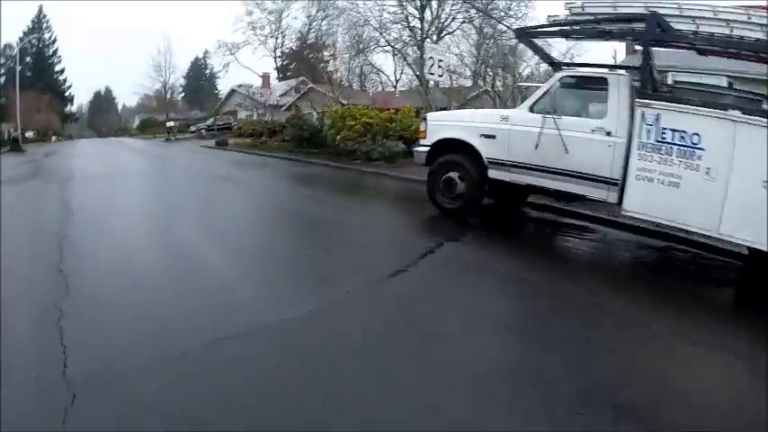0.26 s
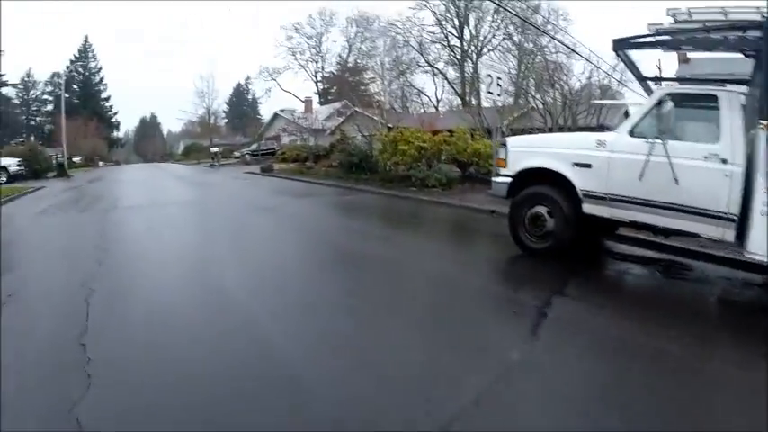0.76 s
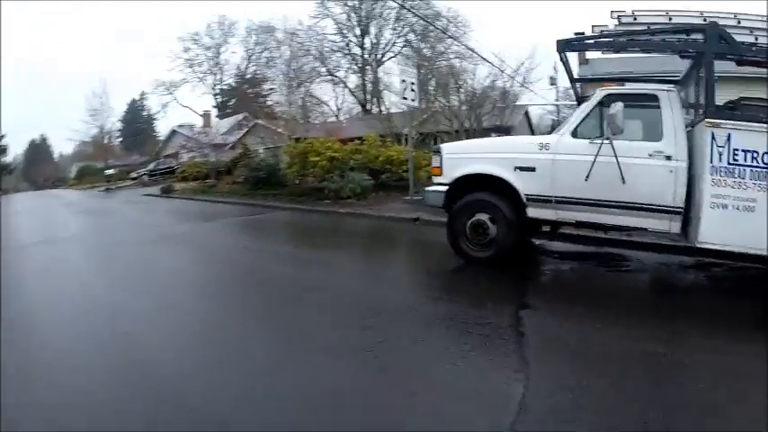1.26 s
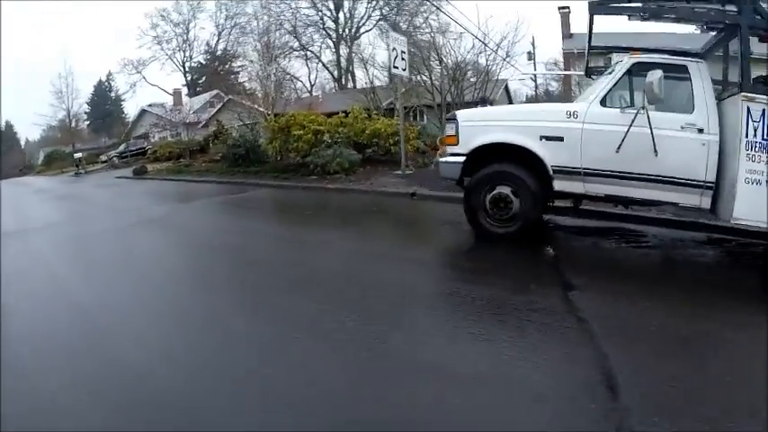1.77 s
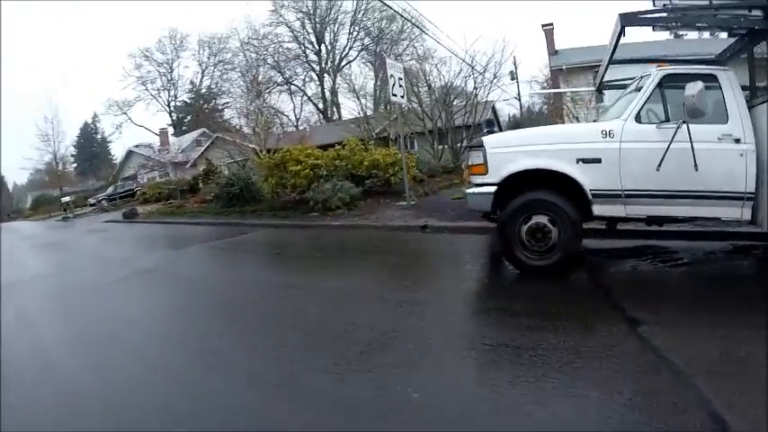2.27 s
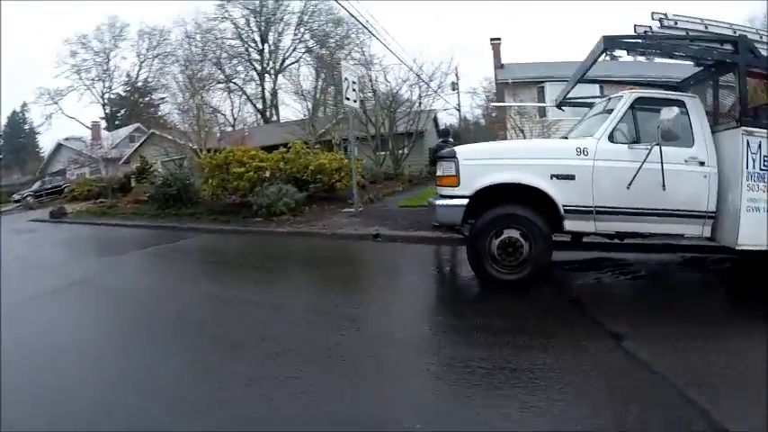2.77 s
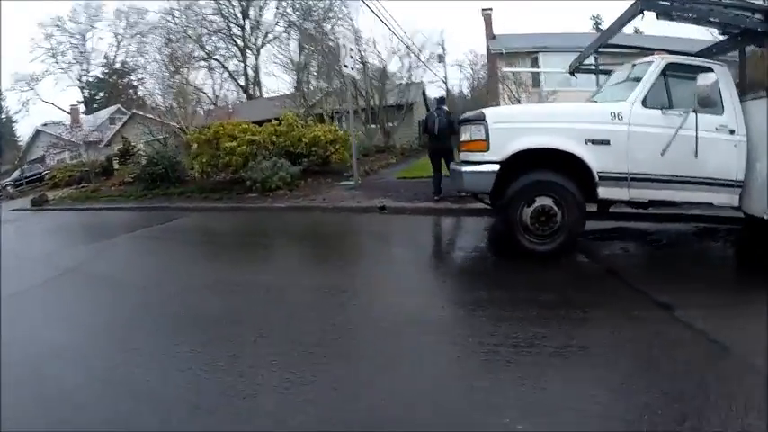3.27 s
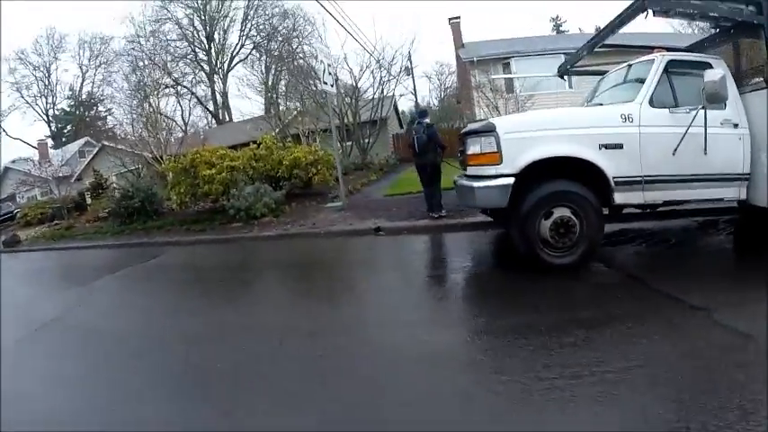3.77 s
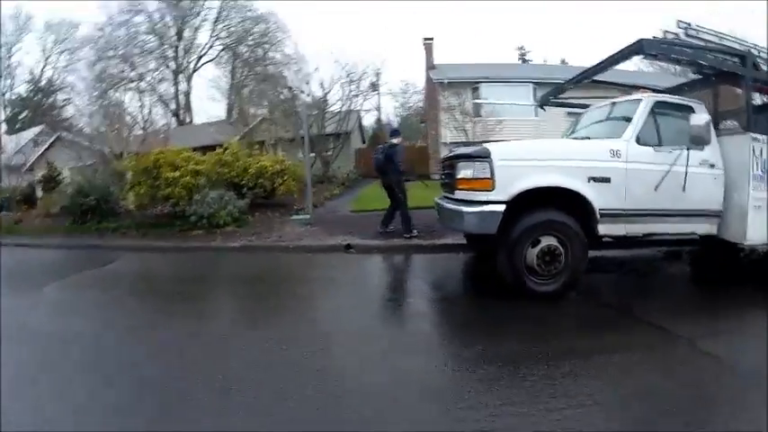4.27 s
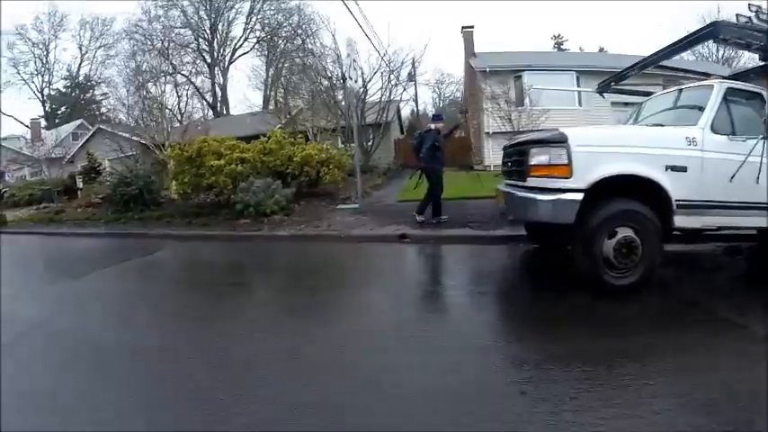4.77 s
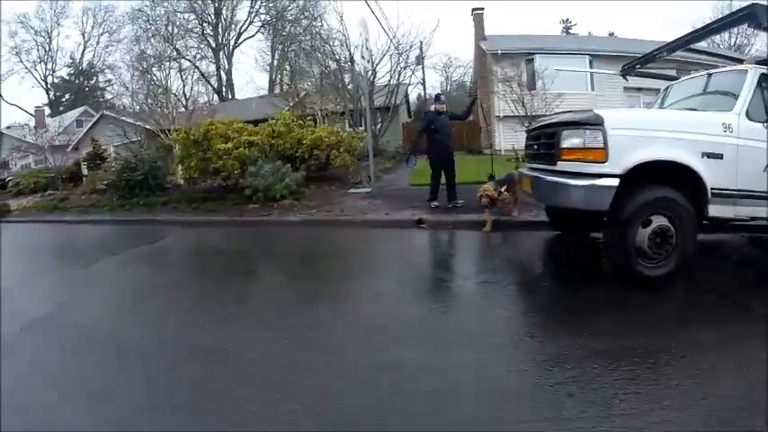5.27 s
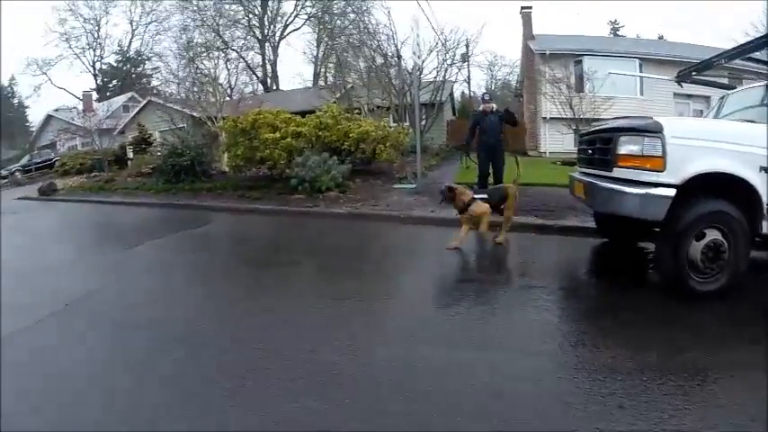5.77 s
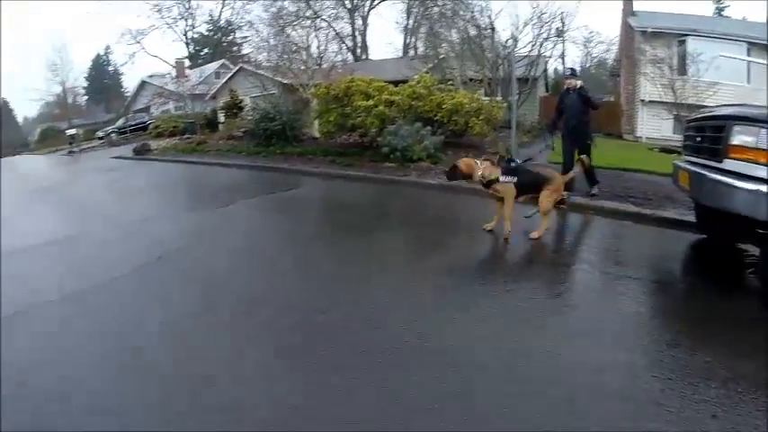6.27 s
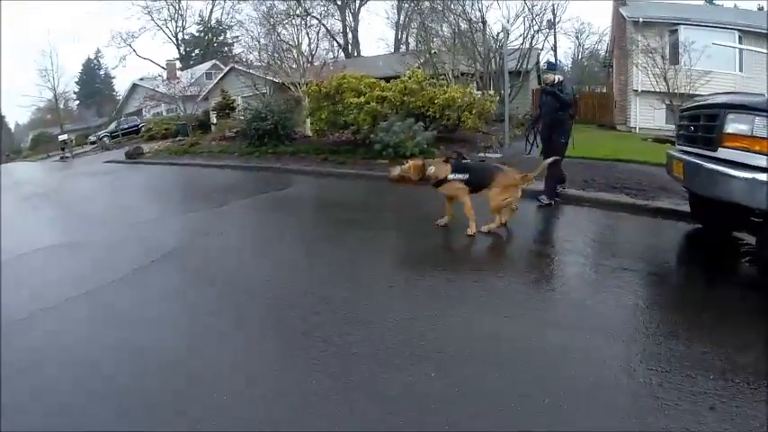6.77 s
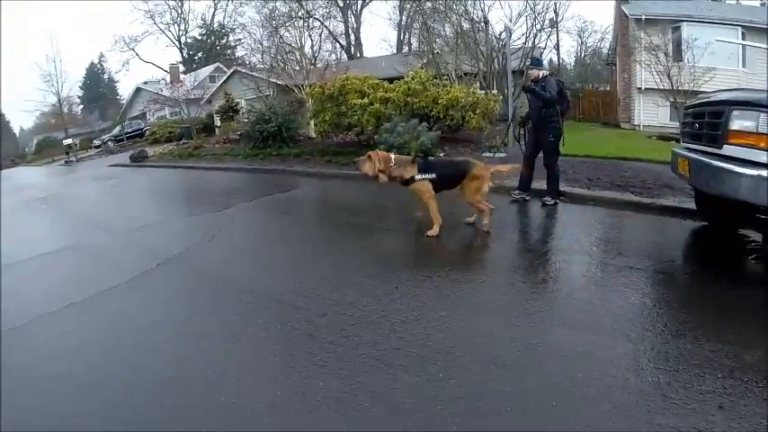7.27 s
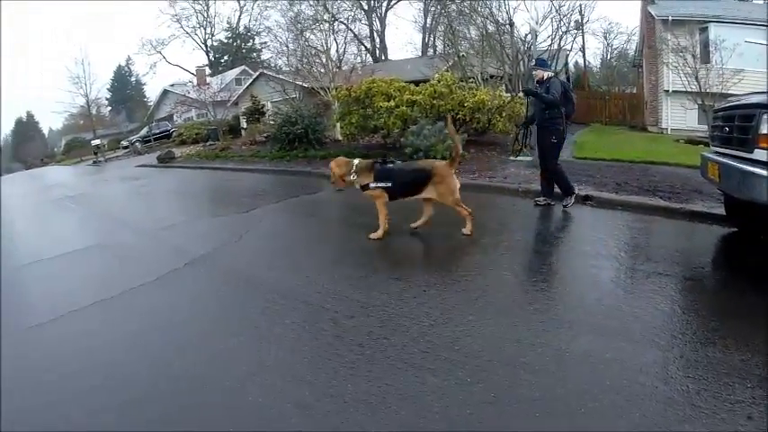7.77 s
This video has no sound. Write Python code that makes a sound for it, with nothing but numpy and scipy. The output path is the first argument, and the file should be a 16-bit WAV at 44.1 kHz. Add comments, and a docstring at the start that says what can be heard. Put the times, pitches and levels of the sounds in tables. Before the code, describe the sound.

Light rain strikes the microphone's housing in sharp, close, irregular clinks, over a low outdoor rumble, hiss and a thin high whine. Soft handling bumps, a few hollow knocks, faint squeaks and clothing rustles come in between. Near the end a dog trots onto the wet suburban street: harness rings tinkle, metal tags jingle in time with its steps, and its paws splash lightly.

```python
"""Sharp, close clinks of light rain over a low outdoor rumble, microphone hiss and a thin high whine.
The clinks are most likely drops striking a camera's housing, whose modes ring; the moving camera bumps
softly on its mount, among a few hollow knocks, faint squeaks and rustles of clothing.
Near six seconds a dog in a harness trots out on its leash: rings and clips tinkle, metal tags jingle
in time with its steps, and its paws splash on the wet asphalt of a suburban street."""
import sys
import numpy as np
from scipy import signal
from scipy.fft import rfft, irfft
from scipy.io import wavfile
from scipy.ndimage import uniform_filter1d

SR = 44100
rng = np.random.default_rng(int(sys.argv[2]) if len(sys.argv) > 2 else 0)


def master_out(mix):
    """Clip the mix to full scale and print it as 16-bit PCM to the path in sys.argv[1]."""
    frames = np.transpose(np.atleast_2d(mix))
    ceiling = np.clip(frames, -1, 1)
    pcm = np.round(ceiling * 32767).astype(np.int16)
    wavfile.write(sys.argv[1], SR, pcm)


N = 354411
TIME = np.arange(N) / SR

# resonances of the housing: pitch_hz, level_db, t60_s
HOUSING_MODES = [(1730, 23.5, 0.015), (1851, 13.5, 0.025), (2188, -3.5, 0.06), (2323, 12, 0.014),
                 (2872, 9.5, 0.011), (3200, 3.5, 0.012), (4124, 17.5, 0.0048), (4850, -2.5, 0.01508),
                 (6020, 15.5, 0.0044), (7350, 2.5, 0.0032), (9200, 4, 0.0022), (11600, 1, 0.0027)]
# borders that split those resonances into bands: edge_hz
BAND_EDGES = [1400, 2000, 2500, 3500, 5300, 8500, 16000]
# how hard the harness swings: time_s, level_db
HARNESS_SWING = [(0, -88.5), (5.75, -90.5), (5.95, -79), (6.3, -70), (6.8, -68), (7.15, -71.5),
                 (7.6, -80.5), (8.04, -92)]


def from_db(db):
    return 10 ** (np.asarray(db) / 20)


def unit_rms(x):
    return x / np.sqrt(np.mean(x ** 2) + 1e-20)


def unit_hit(x):
    """Scale a short sound to the energy of 10 ms at rms 1."""
    return x / np.sqrt(np.sum(x ** 2) / (SR / 100) + 1e-20)


def add(out, start_s, sound):
    at = max(round(start_s * SR), 0)
    out[at:at + len(sound)] += sound[:N - at]


def filtered(x, hz, kind, order=2):
    return signal.sosfilt(signal.butter(order, hz, kind, fs=SR, output="sos"), x)


def coloured_noise(spectrum):
    """Steady noise at rms 1, shaped by rows of frequency_hz, level_db."""
    hz, db = np.transpose(spectrum)
    bin_hz = np.maximum(np.arange(N // 2 + 1) * SR / N, 1)
    gain = from_db(np.interp(np.log(bin_hz), np.log(hz), db))
    return unit_rms(irfft(rfft(rng.standard_normal(N)) * gain, N))


def ring(force, hz, t60_s):
    """One resonance: a unit click sets off a dying sine of height 1."""
    decay, angle = from_db(-60 / (t60_s * SR)), 2 * np.pi * hz / SR
    return signal.lfilter([0, np.sin(angle)], [1, -2 * decay * np.cos(angle), decay ** 2], force + 1e-18)


def swell(x, peak, width):
    return np.exp(-np.minimum(((x - peak) / width) ** 2, 50))


def drift(per_s):
    """A smooth random wander at rms 1."""
    knots = rng.standard_normal(600)
    return unit_rms(np.interp(TIME * per_s, np.arange(len(knots)), knots))


def scattered(start_s, end_s, count):
    """Random moments, one in each equal slice of the stretch."""
    return start_s + (end_s - start_s) * (np.arange(count) + rng.random(count)) / count


def rumble_and_hiss(rumble_gain_db=6.5, wander_db=1.6, hiss_db=-51.0, whine_db=-75, fade_db_per_s=0.2446):
    """A wandering outdoor rumble under microphone hiss and a thin high whine, which both fade slightly."""
    # colour of the rumble and hiss: frequency_hz, level_db
    colour = [(20, -1), (42, 2.5), (80, -7.5), (130, -10), (220, -18.5), (500, -22), (1000, -26),
              (2400, -28), (4500, -33.5), (6500, -36.5), (8500, -43), (12000, -46.5), (16000, -57.5)]
    # rise and fall of the rumble: time_s, level_db
    contour = [(0.0, -62.5), (0.36, -54.5), (0.54, -57), (2.17, -60), (2.59, -58), (3.96, -60.5),
               (5.12, -55.5), (8.04, -63)]
    rumble_db = rumble_gain_db + np.interp(TIME, *np.transpose(contour)) + wander_db * drift(per_s=9)
    rumble = from_db(rumble_db) * filtered(coloured_noise(colour), 120, "low")
    hiss = from_db(hiss_db) * filtered(coloured_noise(colour), 100, "high")
    whine = from_db(whine_db) * unit_rms(ring(rng.standard_normal(N), hz=5680, t60_s=.016))
    return rumble + from_db(-fade_db_per_s * TIME) * (hiss + whine)


def drizzle(level_db=-57, spread_db=2, tilt_db_per_octave=0, count=6):
    """Faint extra drops at random moments, each favouring one resonance of the housing."""
    return [(start_s, rng.normal(level_db, spread_db), tilt_db_per_octave, rng.choice(HOUSING_MODES)[0])
            for start_s in scattered(0, TIME[-1], count)]


def share_of_blow(tilt_db_per_octave, spot_hz, pivot_hz=2200, spot_db=13.5, spot_octaves=0.28):
    """Each band's share in dB: a hard blow is brighter, and the landing spot lifts bands near its pitch."""
    # what a plain blow gives each band, low to high: level_db
    plain_blow = [-4.5, 1.5, 1.16, -6.5, -9.5, -23]
    centre_hz = np.sqrt(np.multiply(BAND_EDGES[:-1], BAND_EDGES[1:]))
    tilt_db = tilt_db_per_octave * np.log2(centre_hz / pivot_hz)
    lift_db = spot_db * swell(np.log2(centre_hz), np.log2(spot_hz), spot_octaves)
    band_db = plain_blow + tilt_db + lift_db
    return band_db - 10 * np.log10(np.sum(from_db(band_db) ** 2))


def housing_ring(force, low_hz, high_hz, vary_db=1.0, wander_widths=.2):
    """The modes in one band ring; each shifts a little within its own width from blow to blow."""
    out = 0
    for hz, mode_db, t60_s in HOUSING_MODES:
        if low_hz <= hz < high_hz:
            width_hz = np.log(1000) / (np.pi * t60_s)
            gain = from_db(mode_db + rng.normal(0, vary_db))
            out = out + gain * ring(force, hz + rng.normal(0, wander_widths) * width_hz, t60_s)
    return unit_hit(filtered(out, [low_hz * .85, high_hz * 1.2], "band"))


def drops(ring_gain_db=0.47, splat=0.12, splat_s=0.0011, thud_db=-25, tail_db=-26, tail_t60_s=0.048):
    """Each drop hits and spreads in about a millisecond; where it lands colours the housing's clink."""
    # raindrops on the housing: start_s, level_db, tilt_db_per_octave, spot_hz
    hits = [(0.2818, -50.5, -8, 3300), (0.407, -52.5, 9.5, 1970), (0.7442, -24, 1.0, 1845),
            (0.7942, -34.5, 5.5, 5070), (0.8112, -40, -6, 5750), (1.034, -37.5, 5, 1880),
            (1.1122, -42, -3.5, 5100), (1.2285, -24, 0, 1867), (1.5466, -32.5, 4.0, 5080),
            (1.5758, -35.5, 2.5, 1850), (1.7871, -40, 6.0, 1910), (2.3011, -43, 8, 1460),
            (2.7735, -21.5, -3.5, 1490), (3.0183, -36, 0, 3660), (3.0749, -33, 4, 1630),
            (3.236, -43.5, -5.5, 5360), (3.3908, -48.5, -4, 3600), (3.5555, -17, 5, 5750),
            (3.5568, -17.5, 3, 2950), (3.5714, -42, 1, 3440), (3.8422, -47.5, 8.5, 1600),
            (3.9014, -29, 7, 2477), (4.386, -52.5, 2, 1600), (4.5354, -49, 7.5, 1600),
            (4.5479, -47.5, 4, 1900), (4.5868, -51, -3, 3000), (4.6173, -24.5, 8.5, 1920),
            (4.7046, -47, 3, 1950), (4.888, -42.5, -3.5, 1970), (5.146, -18, -3.5, 1873),
            (5.1607, -28.5, -1, 1490), (5.2533, -29.5, -2.0, 5300), (5.739, -36.5, 8, 1630),
            (5.9502, -47, -0.5, 3720), (6.4329, -23.5, 6.5, 1896), (6.5715, -30.5, 2.5, 1886),
            (6.869, -45, 0.5, 1930), (7.018, -43.5, 0.5, 1510), (7.191, -35, -0.5, 1924),
            (7.462, -37.5, 0, 3660), (7.7359, -35.5, -3.5, 5230), (7.7525, -40, -2, 5250)]
    out, t = np.zeros(N), TIME[:SR // 10]
    for start_s, level_db, tilt, spot_hz in list(hits) + drizzle():
        band_db = level_db + share_of_blow(tilt, spot_hz)
        force = splat * rng.standard_normal(len(t)) * np.exp(-t / splat_s)
        force[0] += 1
        # the frame behind the housing rings on, faint and dense
        frame = rng.standard_normal(len(t)) * from_db(-60 * t / tail_t60_s)
        # below its lowest mode the shell just gives way
        thud = unit_hit(filtered(force, [500, 1400], "band", order=1))
        clink = from_db(band_db[0] + thud_db) * thud
        for low_hz, high_hz, db in zip(BAND_EDGES, BAND_EDGES[1:], band_db):
            modes = housing_ring(force, low_hz, high_hz)
            tail = unit_hit(filtered(frame, [low_hz, high_hz], "band"))
            clink += from_db(db + ring_gain_db) * (modes + from_db(tail_db) * tail)
        add(out, start_s, clink)
    return out


def bumps(mount_hz=130, width_s=0.019, pitch_spread=0.071, rub_db=-12, light_db=-55, spread_db=1.8):
    """Each jolt of the moving camera sways its mount at a low resonance, with a little rubbing."""
    # the strongest jolts: peak_s, level_db
    strong_jolts = [(0.797, -49.5), (1.02, -50.5), (1.596, -45.5), (1.704, -45), (2.015, -51.5),
                    (2.338, -43.5), (2.428, -41), (3.026, -47), (3.645, -49.5), (4.875, -44),
                    (6.392, -43.5), (6.484, -43.5), (6.77, -46.5), (7.173, -51), (7.84, -46)]
    light_jolts = [(s, rng.normal(light_db, spread_db)) for s in scattered(0.22, 7.3, count=22)]
    sway, envelope = np.zeros(N), np.zeros(N)
    t, lead_s = TIME[:SR // 5], 0.1
    for peak_s, level_db in strong_jolts + light_jolts:
        detune, phase = rng.standard_normal(2)
        hz = mount_hz * (1 + pitch_spread * detune)
        jolt = from_db(level_db) * swell(t, lead_s, width_s)
        add(envelope, peak_s - lead_s, jolt)
        add(sway, peak_s - lead_s, jolt * np.sqrt(2) * np.sin(2 * np.pi * (hz * t + phase)))
    rub = unit_rms(filtered(rng.standard_normal(N), [140, 280], "band"))
    return sway + from_db(rub_db) * envelope * rub


def squeaks(width_s=0.0023, t60_s=0.0097):
    """Faint, rough squeaks: tiny swells of noise through a narrow resonance."""
    # the squeaks: peak_s, pitch_hz, level_db
    chirps = [(1.469, 2780, -51), (6.518, 2840, -42.5), (7.672, 2610, -52), (7.695, 3000, -49.5)]
    out = np.zeros(N)
    for peak_s, hz, level_db in chirps:
        rough_tone = unit_rms(ring(rng.standard_normal(N), hz, t60_s))
        out += from_db(level_db) * swell(TIME, peak_s, width_s) * rough_tone
    return out


def knocks(t60_s=0.021):
    """The camera mount answers a few blows with a short hollow note."""
    # blows that reach the mount: start_s, pitch_hz, level_db
    blows = [(1.5464, 840, -48), (3.5554, 830, -52.5), (7.189, 830, -53)]
    out, click = np.zeros(N), signal.unit_impulse(SR // 10)
    for start_s, hz, level_db in blows:
        note = filtered(ring(click, hz, t60_s), hz / 2, "high")
        add(out, start_s, from_db(level_db) * unit_hit(note))
    return out


def rustles():
    """Clothing brushes in soft swells of noise."""
    # brushes of cloth: peak_s, width_s, level_db
    brushes = [(4.756, 0.08, -65), (4.894, 0.019, -53.5), (5.028, 0.008, -56), (5.493, 0.042, -61),
               (6.797, 0.018, -54)]
    # colour of the cloth: frequency_hz, level_db
    colour = [(200, -24), (700, 5.5), (1200, -3), (2200, 5), (3500, -4), (6000, -6.5), (14000, -40)]
    envelope = sum(from_db(db) * swell(TIME, peak_s, width_s) for peak_s, width_s, db in brushes)
    return envelope * coloured_noise(colour)


def rings_and_clips(gain_db=1.5, touches_per_s=1300, t60_s=.02, spread_db=5.5, flutter_db=2.0, count=24):
    """Small rings and clips tinkle in quick flurries as the harness swings, each at its own pitch."""
    tinkle = 0
    for hz in np.geomspace(4300, 12400, count) * rng.normal(1, 0.012, count):
        force, at = np.zeros(N), rng.integers(0, N, size=2000)
        touching = rng.random(len(at)) < touches_per_s * TIME[-1] / count / len(at)
        force[at] = touching * from_db(rng.normal(0, spread_db, len(at)))
        tinkle = tinkle + ring(force, hz, t60_s)
    swing_db = np.interp(TIME, *np.transpose(HARNESS_SWING)) + flutter_db * drift(per_s=45)
    return from_db(gain_db + swing_db) * unit_rms(tinkle)


def trot(first_s=6.352, step_s=.2055):
    """The dog's even beat, as rows of start_s, jingle_db, splash_db."""
    # weight of each step in turn: jingle_db, splash_db
    accents = [(-51, -53), (-50, -57), (-60, -54), (-54.5, -61), (-55.5, -53)]
    return [(first_s + k * step_s, *levels) for k, levels in enumerate(accents)]


def paws(gain_db=7.5, rise_s=0.0028, fall_s=.011, lag_s=0.0225, lead_s=0.0045, grain_db=4.5):
    """A paw slaps the film of water just after each beat, and the water sprays off in fine grains."""
    # paws set down out of step: time_s, level_db
    stray_steps = [(6.052, -63.5), (6.334, -57.5), (6.467, -57.5), (6.502, -54), (6.644, -57.5),
                   (6.948, -57.5), (7.083, -50.5), (7.34, -59), (7.569, -60.5)]
    in_step = [(s + lag_s, splash_db) for s, _, splash_db in trot()]
    # lighter pats fall at random and follow the swing of the harness in level
    pats = [(s, np.interp(s, *np.transpose(HARNESS_SWING)) + rng.normal(2, 1.2))
            for s in scattered(5.8, 7.5, count=30)]
    envelope, t = np.zeros(N), TIME[:SR // 8] - 0.02
    slap = np.where(t < 0, swell(t, 0, rise_s), np.exp(-t / fall_s))
    for time_s, level_db in in_step + stray_steps + pats:
        add(envelope, time_s - lead_s + t[0], from_db(level_db) * slap)
    flicker = unit_rms(uniform_filter1d(rng.standard_normal(N), size=40))
    grains = unit_rms(from_db(grain_db * flicker))
    # colour of the splash: frequency_hz, level_db
    colour = [(500, -12), (1500, 1.5), (3000, 5.5), (5000, 12), (6500, 3), (9000, -9.5), (12500, -1),
              (16000, -38)]
    return from_db(gain_db) * envelope * grains * coloured_noise(colour)


def tags(gain_db=4.0, spread_s=0.0056, lead_s=0.015, vary_db=1.5, contacts=6):
    """Each shake is a huddle of contacts; the tags press together, so pitch and strength keep shifting."""
    # resonances of the tags and buckles: pitch_hz, level_db, t60_s
    metal_modes = [(4770, -10, .1), (6600, -13, .04), (8350, -12, .09), (9200, -12, .05),
                   (10200, -17, .025), (11460, -3.5, 0.088), (12100, -9, .03), (12000, 0, 0.074),
                   (12950, -14, .025), (15160, -18, .04)]
    # shakes out of step: time_s, level_db
    stray_shakes = [(6.67, -66), (7.042, -63), (7.352, -65), (7.468, -58.5)]
    in_step = [(s, jingle_db) for s, jingle_db, _ in trot()]
    out = np.zeros(N)
    for time_s, level_db in in_step + stray_shakes:
        touch_s = rng.normal(2 * spread_s, spread_s, contacts)
        at = np.clip(touch_s * SR, 0, SR // 10).astype(int)
        jingle = 0
        for hz, mode_db, t60_s in metal_modes:
            force = np.zeros(SR // 4)
            force[at] = rng.standard_normal(contacts)
            detune = rng.normal(1, .003)
            gain = from_db(mode_db + rng.normal(0, vary_db))
            jingle = jingle + gain * unit_rms(ring(force, hz * detune, t60_s))
        add(out, time_s - lead_s, from_db(level_db + gain_db) * unit_hit(jingle))
    return out


def scene():
    """Close hits, the dog and small handling sounds over a bed of rumble and hiss, in mono."""
    close_hits = drops() + knocks()
    dog = tags() + rings_and_clips() + paws()
    handling = bumps() + squeaks() + rustles()
    return (close_hits + dog + handling + rumble_and_hiss())[None]


def record(dry, cutoff_hz=16300):
    """Limit hard at full scale, then cut the very top steeply."""
    lowpass = signal.ellip(10, .1, 80, cutoff_hz, fs=SR, output="sos")
    return signal.sosfilt(lowpass, np.clip(dry, -1, 1))


dry = scene()
out = record(dry)
master_out(out)
```